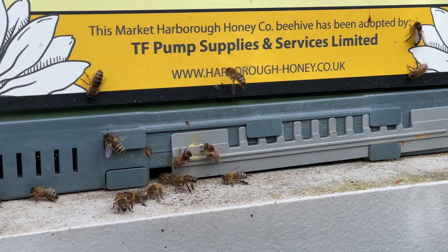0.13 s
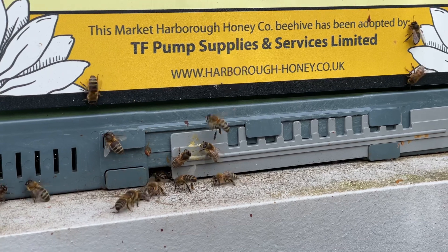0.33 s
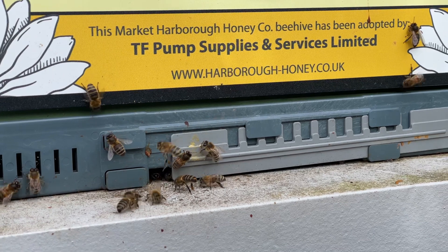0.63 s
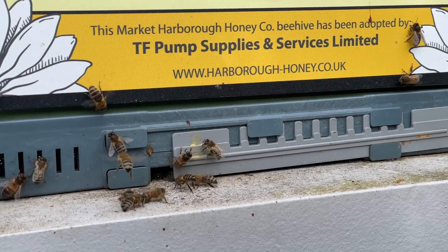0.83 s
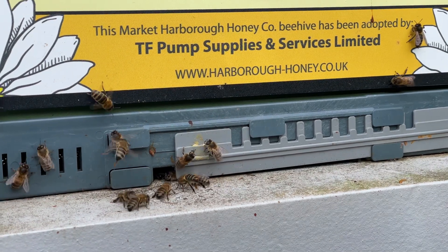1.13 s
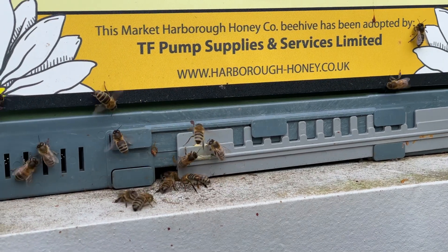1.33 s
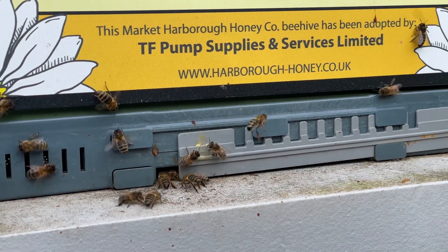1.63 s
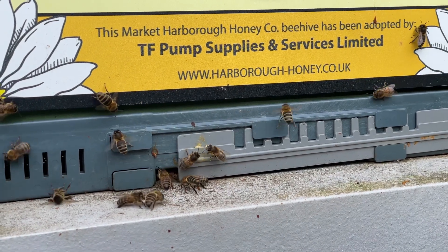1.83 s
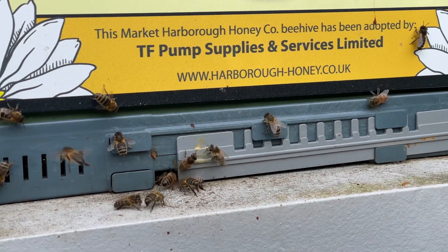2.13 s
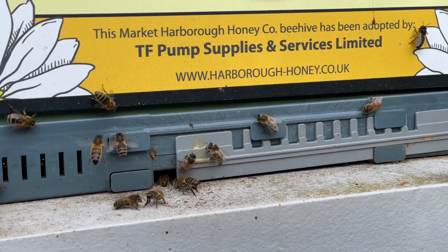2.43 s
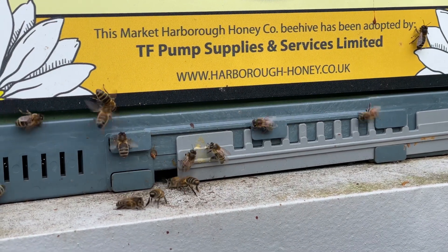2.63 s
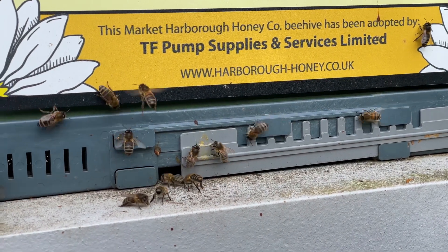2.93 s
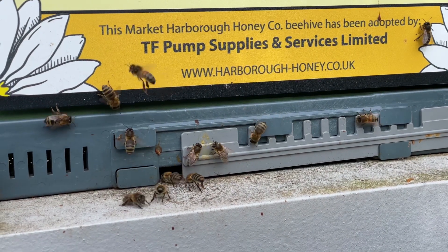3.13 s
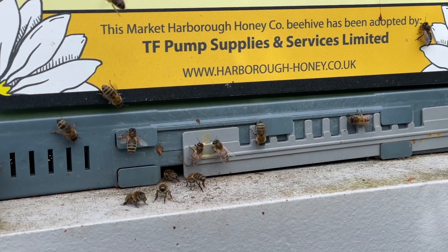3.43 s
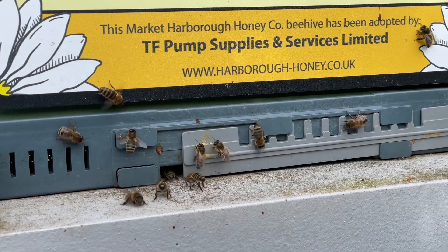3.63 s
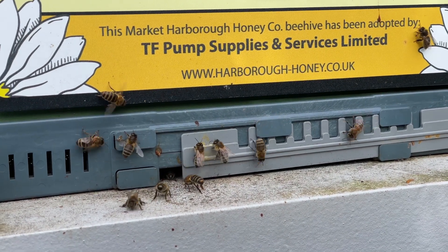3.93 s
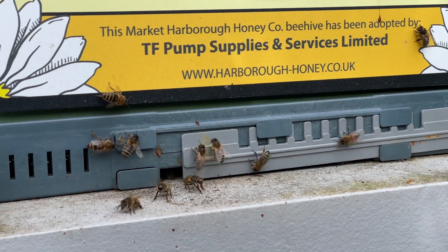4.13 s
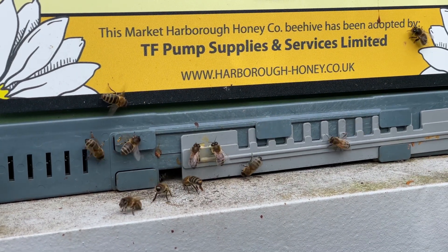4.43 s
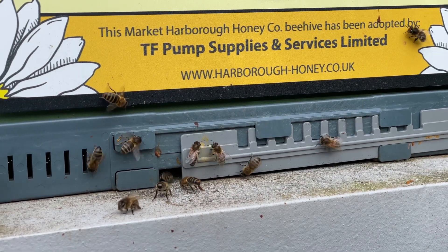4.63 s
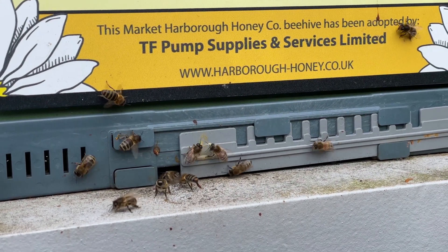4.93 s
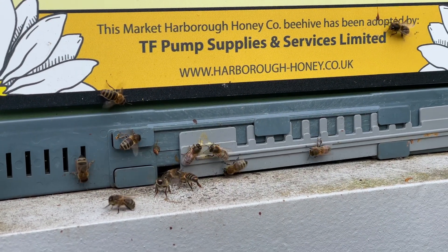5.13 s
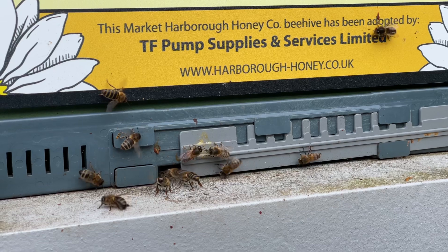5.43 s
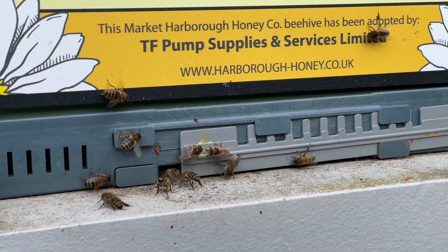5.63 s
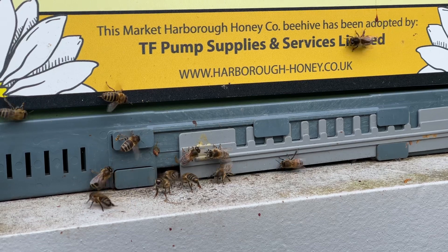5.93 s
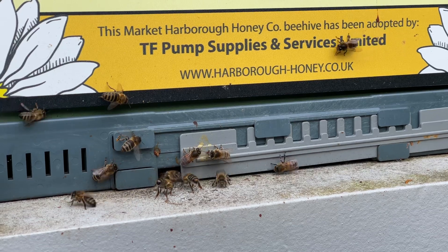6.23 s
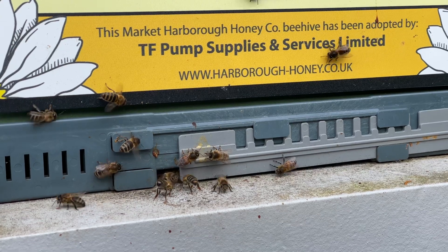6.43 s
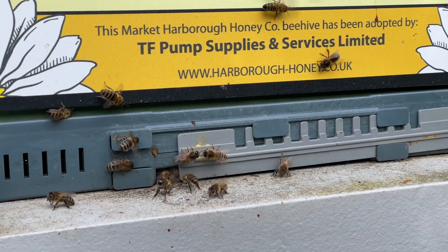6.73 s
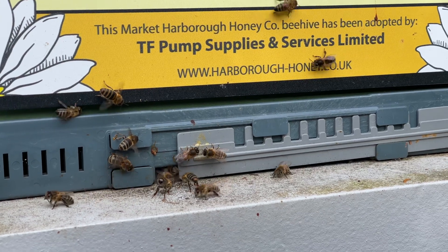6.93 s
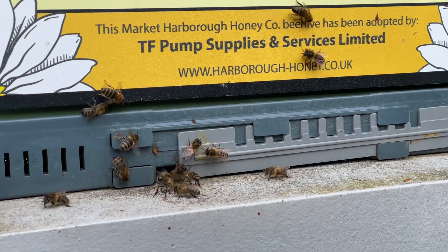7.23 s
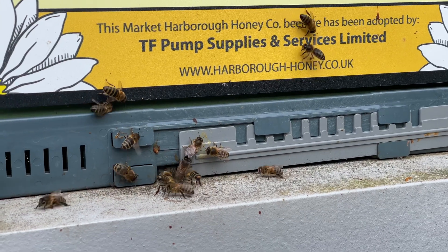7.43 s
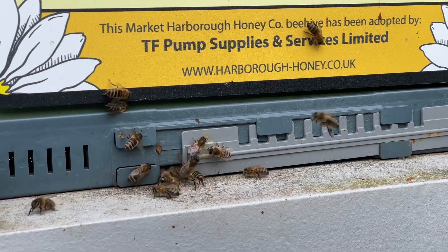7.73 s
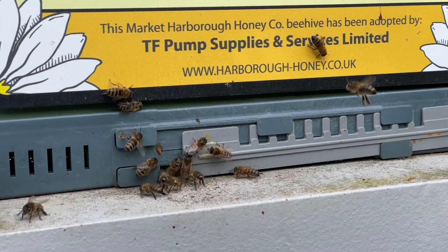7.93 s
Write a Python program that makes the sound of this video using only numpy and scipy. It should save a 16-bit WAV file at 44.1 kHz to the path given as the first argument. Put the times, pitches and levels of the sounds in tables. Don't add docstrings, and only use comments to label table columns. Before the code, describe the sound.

Outdoors, a faint bee swarm hums under gusty wind thumps; single bees buzz past, then one hovers at the microphone, blasting it with air.

```python
import sys
import numpy as np
from scipy import signal
from scipy.fft import rfft, irfft, next_fast_len
from scipy.io import wavfile
from scipy.ndimage import uniform_filter1d, minimum_filter1d, map_coordinates

SR = 44100
rng = np.random.default_rng(int(sys.argv[2]) if len(sys.argv) > 2 else 0)


def elevation(decibels):
    levels = np.asarray(decibels, float)
    return 10 ** (levels / 20)


def dump_mix(stems):
    frames = np.atleast_2d(stems).T
    limited = np.clip(frames, -1, 1)
    pcm = np.round(limited * 32767).astype(np.int16)
    wavfile.write(sys.argv[1], SR, pcm)


N = 356901


def evened(x):
    return x / np.sqrt(np.mean(x ** 2) + 1e-20)


def read(points, hz):
    f, value = np.transpose(points)
    return np.interp(np.log(hz + 1), np.log(f + 1), value)


def add(mix, s, sound):
    part = mix[..., round(s * SR):][..., :sound.shape[-1]]
    part += sound[..., :part.shape[-1]]


def drift(per_s, size=N):
    knots = rng.standard_normal(700)
    return map_coordinates(knots, [np.arange(size) * per_s / SR + 2], order=2)


def turn(x, lead):
    size = next_fast_len(N + 4096)
    hz = np.fft.rfftfreq(size, 1 / SR)
    half = np.exp(.5j * read(lead, hz) * np.array([[1], [-1]]))
    return irfft(rfft(x, size) * half, size)[:, :N]


# (frequency [Hz], likeness [0-1])
PORT_LIKENESS = [(60, 0.99), (250, 0.79), (600, 0.49), (950, 0.15), (1850, 0.98), (2700, 0.99),
                 (3200, 0.89), (5200, 0.95), (5700, 0.083), (8200, 0.92), (9600, 0.97), (10200, 0.57),
                 (12200, 0.93), (12800, 0.91)]


def noise(colour, patchy_db=0., size=1024):
    frames, hz = 4 * N // size + 5, np.fft.rfftfreq(size, 1 / SR)
    a, b, c, d, patches = rng.standard_normal((frames, len(hz), 5)).T
    patches = evened(uniform_filter1d(uniform_filter1d(patches, 12, 0), 14, 1))
    same = np.clip(read(PORT_LIKENESS, hz), 0, 1)[:, None]
    shared = np.sqrt(1 + same) * (a + 1j * b)
    apart = np.sqrt(1 - same) * (c + 1j * d)
    gain = elevation(read(colour, hz)[:, None] + patchy_db * patches)
    z = np.array([shared + apart, shared - apart]) * gain
    return evened(signal.istft(z, nperseg=size, noverlap=3 * size // 4)[1][:, :N])


def eddies(rows, sag=0.26):
    out = np.zeros(N)
    for (s, db, hz, cycles), start in zip(rows, rng.uniform(-np.pi, np.pi, 40)):
        u = np.arange(-.04, .04, 1 / SR) * hz
        phase = 2 * np.pi * (u - sag * u * np.tanh(u) / 2) + start
        swell = np.exp(-(2 * u / cycles) ** 2)
        add(out, max(s - .04, 0), elevation(db) * swell * np.cos(phase))
    return out


def wings(hz, levels_db, flutter, waver_db, spread):
    size = len(hz)
    unsteady_hz = hz * (1 + flutter * drift(60, size=size))
    beat = 2 * np.pi * (rng.random() + np.cumsum(unsteady_hz) / SR)
    out = np.zeros((2, size))
    for k, db in enumerate(levels_db, 1):
        gap = spread * np.sqrt(k) * rng.uniform(-0.54, 0.57) * np.array([[1], [-1]])
        level = elevation(db + waver_db * k ** 0.2 * drift(30, size=size))
        out -= level * np.sin(k * beat + gap)
    return np.sqrt(2) * out


def harmonics(level_db, facing_db, third_db, fall_db, lean, count):
    first, second = level_db + facing_db, level_db - lean * facing_db
    third = level_db + third_db + (.15 - lean) * facing_db
    return [first, second] + [third - fall_db * k for k in range(count + 1)]


# (frequency [Hz], level [dB per Hz])
FIELD_COLOUR = [(40, -20.5), (100, 2.5), (250, -5), (550, -6.5), (700, -12.5), (1300, -15.5), (2000, -22),
                (3000, -25.5), (4200, -30), (6000, -30.5), (9000, -26.5), (12500, -29.5), (14200, -33),
                (16000, -41)]


def field():
    return elevation(-45.5 + .6 * drift(1.5)) * noise(FIELD_COLOUR, .7)


def crowd(low_hz, high_hz, harmonics_db, wander, count):
    out = np.zeros((2, N))
    for hz in np.linspace(low_hz, high_hz, count):
        near = elevation(4.2 * drift(4.))
        beat_hz = hz * (1 + wander * drift(3.2))
        out += near * wings(beat_hz, harmonics_db, flutter=0.00621, waver_db=3.0, spread=0.56)
    return evened(out)


FLIER_HARMONICS = [2.5, 1, -4, -2, -2.5, -12, -31.5, -34]
FANNER_HARMONICS = [3, 3.5, -25, -10, -4.5]


def swarm():
    fliers = crowd(230, 285, FLIER_HARMONICS, wander=.03, count=9)
    fanners = crowd(172, 192, FANNER_HARMONICS, wander=0.01177, count=3)
    return elevation(-52) * fliers + elevation(-56.5) * fanners


# (frequency [Hz], level [dB per Hz])
WIND_RUMBLE = [(20, -39), (35, -12.5), (55, 6), (80, 3), (120, -4.5), (200, -13), (350, -31.5), (600, -53)]
# (peak time [s], level [dB], half length [s])
WIND_GUSTS = [(0.066, -41.5, 0.07), (0.463, -37.5, 0.1), (0.784, -38.5, 0.036), (1.01, -32, 0.065),
              (1.337, -37.5, 0.08), (1.58, -35, 0.066), (1.863, -37, 0.081), (2.15, -38.5, 0.14),
              (2.323, -37.5, 0.03), (2.603, -30.5, 0.049), (2.74, -34.5, 0.053), (2.983, -39, .1),
              (3.2, -50, .1), (3.431, -34.5, 0.015), (3.846, -40, 0.099), (4.8, -47.5, 0.36),
              (5.794, -42, 0.063), (6.105, -45, 0.074), (6.55, -46, 0.26), (6.818, -52, .06),
              (7.11, -45.5, 0.17)]
# (time [s], peak level [dB], frequency [Hz], length [cycles])
WIND_BURSTS = [(0.042, -24, 66, 0.7), (0.559, -30, 70, 1.9), (0.801, -31, 79, 1.3),
               (0.984, -22.5, 150, 0.97), (0.997, -23.5, 82.5, 2.2), (1.303, -27, 94, 2.5),
               (1.334, -31, 197, 3.4), (1.346, -24, 86, 1.7), (1.41, -26.5, 66.4, 2.7),
               (1.455, -31, 65, 2.3), (1.75, -26, 70, 1.2), (1.832, -32, 220, 0.84),
               (1.842, -18.5, 60, 1.2), (2.321, -38, 120, 1.4), (2.563, -17, 90.5, 0.48),
               (2.657, -20, 215, 1.3), (2.666, -18, 85, 0.62), (2.718, -19, 74.4, 0.88),
               (2.758, -25.5, 200, 1.2), (2.766, -23.5, 78, 2.8), (2.955, -32, 116, 1.3),
               (2.989, -30, 70.4, 2.9)]


def wind(calm_db=-45):
    t = np.arange(N) / SR
    power = elevation(2 * calm_db)
    for s, db, half_s in WIND_GUSTS:
        power = power + elevation(2 * db) * np.exp(-((t - s) / half_s) ** 2)
    rumble = noise(WIND_RUMBLE, size=2048)
    return np.sqrt(power) * elevation(1.35 * drift(12.0)) * rumble + eddies(WIND_BURSTS)


# (start [s], end [s], bright level [dB], bright width [Hz], dull level [dB])
BRUSHES = [(0.36, 0.44, -61, 3000, -87.5), (1.726, 1.753, -47.5, 3500, -68), (1.752, 1.775, -50, 2500, -72),
           (1.943, 1.98, -58, 2000, -75), (2.926, 3.103, -64.5, 3000, -66), (3.326, 3.398, -66, 3000, -74),
           (5.62, 5.68, -56.5, 5000, -55), (5.67, 5.73, -57, 4000, -64), (6.524, 6.659, -47.5, 5000, -51.5),
           (6.65, 6.72, -64, 4000, -74), (7.543, 7.559, -44.5, 3000, -56), (7.562, 7.606, -49, 1500, -60),
           (7.616, 7.65, -50.5, 1500, -61.5), (7.71, 7.736, -54, 800, -68), (7.75, 7.77, -64, 1000, -66),
           (7.778, 7.855, -59.5, 1000, -65), (7.647, 7.9, -66, 900, -71)]
# (frequency [Hz], level [dB per Hz])
BRIGHT_HISS = [(2500, -30), (5000, -11), (8000, 9.5), (16000, -1.5)]
# (frequency [Hz], level [dB per Hz])
DULL_HISS = [(900, -5), (1800, -8.5), (2600, -5.5), (4000, -6), (5200, -16), (7000, -10), (9000, -38)]


def rasps(beats_per_s=238, tick_s=.00055, uneven_db=1.6, fade_db=0.5):
    bright, dull = noise(BRIGHT_HISS, size=256), noise(DULL_HISS, size=256)
    out = np.zeros((2, N))
    for start, end, bright_db, width_hz, dull_db in BRUSHES:
        centre_hz = 11300 if start > HOVER_PATH[0][0] else 11400
        t = np.arange(0, end - start, 1 / SR)
        turns = t * beats_per_s
        strength = elevation(uneven_db * rng.standard_normal(80))[turns.astype(int)]
        puff = np.exp(-(turns % 1) / beats_per_s / tick_s) + .15
        ticks = evened(strength * puff)
        ticks *= signal.windows.tukey(len(t), .4) * elevation(fade_db * (t / t[-1] - 1.5))
        at = slice(round(start * SR), round(start * SR) + len(t))
        band = np.exp(-((np.fft.rfftfreq(len(t), 1 / SR) - centre_hz) / width_hz) ** 2 / 2)
        hiss = evened(irfft(rfft(bright[:, at]) * band, len(t)))
        out[:, at] += ticks * (elevation(bright_db) * hiss + elevation(dull_db) * dull[:, at])
    return out


def passer(s, level_db, hz, pass_s, facing_db):
    reach_s = 5 * pass_s
    t = np.arange(max(-s, -reach_s), reach_s, 1 / SR)
    near_db = level_db - 10 * 1.45 * np.log10(1 + (t / pass_s) ** 2)
    third_db = -12 - .25 * (level_db + 37.5)
    levels_db = harmonics(near_db, facing_db, third_db, fall_db=3, lean=0.76, count=9)
    swerve_hz = 5 * .015 / pass_s * np.tanh(t / pass_s / 2)
    beat_hz = hz * (1 + .012 * drift(14, size=len(t))) + swerve_hz
    sound = wings(beat_hz, levels_db, flutter=.028, waver_db=2.2, spread=.6)
    return s + t[0], sound * signal.windows.tukey(len(t), .03 if s < pass_s else .3)


# (closest time [s], level there [dB], wingbeat [Hz], distance over speed [s],
# facing [dB, + head-on, - side-on])
FLYBYS = [(0.0, -57, 239, 0.14, -5.5), (.42, -50, 238.9, 0.095, -0.5), (.88, -49, 267.2, .05, 2),
          (1.07, -63, 251, .06, -6), (2.271, -55, 258, .06, 0), (2.48, -51.5, 243.9, .07, 2),
          (2.95, -57, 246, 0.076, -6), (3.109, -52, 250, 0.076, 1.5), (3.3, -59.5, 251, 0.09, 1),
          (5.606, -39, 240, 0.011, 4), (5.645, -26, 248, .0095, 5), (5.73, -46.5, 249, 0.039, -1.5),
          (5.821, -62, 266, 0.032, 4), (6.04, -52.5, 250, 0.027, 6.5), (6.125, -48, 243.7, .022, -8.5),
          (6.21, -45, 238, 0.041, 3.5), (6.3, -47, 252.4, 0.033, 4), (6.441, -51.5, 236, .04, 4),
          (6.555, -46.5, 245, .035, 1.5), (6.69, -50, 228, 0.044, 4.5), (6.889, -58, 249, 0.042, 9.5)]


def flybys():
    out = np.zeros((2, N))
    for row in FLYBYS:
        add(out, *passer(*row))
    return out


# (time [s], level [dB], facing [dB, + head-on, - side-on])
HOVER_PATH = [
    (7.44, -65, 17.5),
    (7.536, -18, 3),
    (7.565, -26, -13.5),
    (7.65, -21.5, 1),
    (7.76, -22, -14),
    (7.815, -24, 1),
    (7.985, -27, -27),
    (8.02, -39, -2),
    (8.09, -36, -6),
]
# (time [s], wingbeat [Hz])
HOVER_WINGBEAT = [(7.45, 254), (7.54, 231), (7.62, 243), (7.78, 222), (7.836, 247), (7.875, 230),
                  (7.92, 243), (7.99, 217), (8.025, 238)]


def hovering_bee():
    s, level_db, facing_db = np.transpose(HOVER_PATH)
    t = np.arange(s[0], s[-1], 1 / SR)
    hz = uniform_filter1d(np.interp(t, *np.transpose(HOVER_WINGBEAT)), 350, mode="nearest")
    level_db, facing_db = np.interp(t, s, level_db), np.interp(t, s, facing_db)
    levels_db = harmonics(level_db, facing_db, third_db=-11, fall_db=8, lean=0, count=4)
    tone = wings(hz, levels_db, flutter=.015, waver_db=1.6, spread=0)
    return s[0], tone * signal.windows.tukey(len(t), .03)


# (start [s], length [s], start level [dB], end level [dB], low part level [dB])
WING_JETS = [
    (7.554, 0.12, -24, -15.5, -30.5),
    (7.621, 0.2, -17, -27, -35.5),
    (7.883, .02, -26, -34, -30),
    (8.038, .008, -30, -30, -54),
]


def jets(rise_db_per_s=701, fall_db_per_s=496, low_fall_db_per_s=214):
    t, high, low = np.arange(N) / SR, 0, 0
    for s, length, start_db, end_db, low_db in WING_JETS:
        rise = rise_db_per_s * np.maximum(s - t, 0)
        after = np.maximum(t - s - length, 0)
        hold_db = np.interp(t, [s, s + length], [start_db, end_db])
        high = np.maximum(high, elevation(hold_db - rise - fall_db_per_s * after))
        low = np.maximum(low, elevation(low_db - 0.3 * rise - low_fall_db_per_s * after))
    return high, low


# (frequency [Hz], level [dB per Hz])
DOWNWASH = [(25, -24), (60, -5), (150, 5.5), (350, -5), (600, -4), (900, -18.5), (1300, -28.5), (2000, -79)]
# (time [s], peak level [dB], frequency [Hz], length [cycles])
JET_BURSTS = [(7.543, -13.5, 600, 1), (7.555, -16, 150, 1.8), (7.583, -17, 300, 0.6),
              (7.601, -15, 250, 0.55), (7.626, -3.5, 332, 0.94), (7.642, -12, 320, 1.8),
              (7.654, -8, 279, 1.2), (7.663, -5.5, 520, 1), (7.685, -11, 340, 0.77), (7.7, -2, 260, 0.58),
              (7.713, -9, 304, 0.85), (7.738, -7, 497, 1.5), (7.747, -10.5, 183.2, 1.8),
              (7.755, -10.5, 89, 0.92), (7.767, -19, 79, 1.6), (7.873, -6.5, 254, 0.89)]
# (frequency [Hz], phase [radians])
CLOSE_LEAD = [(60, -.45), (250, -.5), (480, -.7), (715, -1.4), (1100, -1.8), (1600, -1.6)]


def hoverer():
    high, low = jets()
    jet = noise(DOWNWASH)
    jet = jet[0] + .35 * (jet - jet[0])
    air = high * elevation(2.5 * drift(90)) * jet
    air += low * evened(noise(WIND_RUMBLE, size=2048)[0])
    near = np.zeros((2, N))
    add(near, *hovering_bee())
    near *= elevation(1.9 * drift(85))
    return turn(near + air + eddies(JET_BURSTS), CLOSE_LEAD)


def scene():
    return field() + swarm() + wind() + rasps() + flybys() + hoverer()


# (frequency [Hz], phase [radians])
PORT_LEAD = [(600, 0), (800, .65), (1200, .55), (1500, 0), (5350, .12), (5800, -1.6), (6500, -.55),
             (7000, -.8), (7600, -2.6), (8300, -np.pi), (9550, -np.pi), (11000, -4.5), (12200, -5.6),
             (12500, -2 * np.pi)]


def microphone(dry, low_cut_hz=33, limit=.7, edge_hz=15760):
    low_cut = signal.butter(4, low_cut_hz, "high", fs=SR, output="sos")
    cut = signal.sosfilt(low_cut, turn(dry, PORT_LEAD))
    room = minimum_filter1d(limit / np.maximum(abs(cut).max(0), limit), size=801)
    cut = cut * uniform_filter1d(uniform_filter1d(room, size=400), size=400)
    edge = signal.firwin(511, edge_hz, window=("kaiser", 9), fs=SR)
    return signal.oaconvolve(cut, edge[None], "same")


def roll_off(x):
    return signal.sosfilt(signal.butter(12, 15730, fs=SR, output="sos"), x)


def record(dry):
    mix = microphone(dry)
    return roll_off(mix)


dry = scene()
out = record(dry)
dump_mix(out)
```